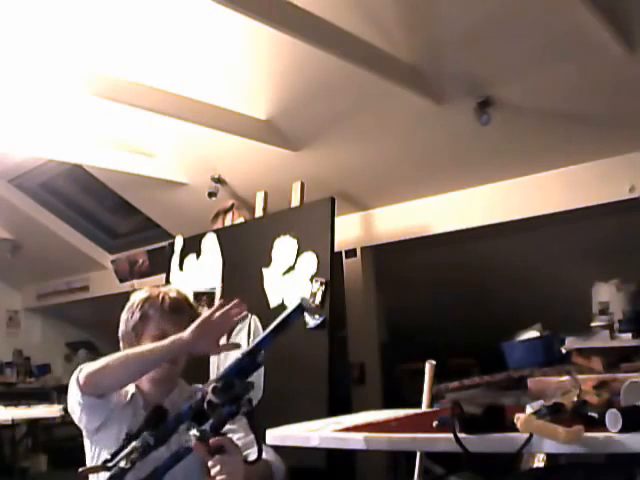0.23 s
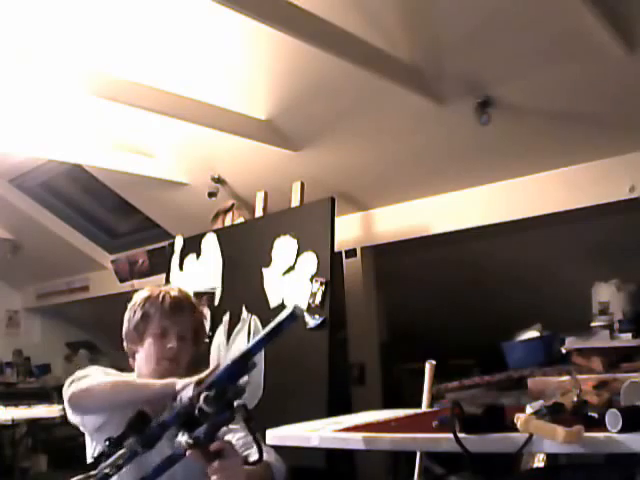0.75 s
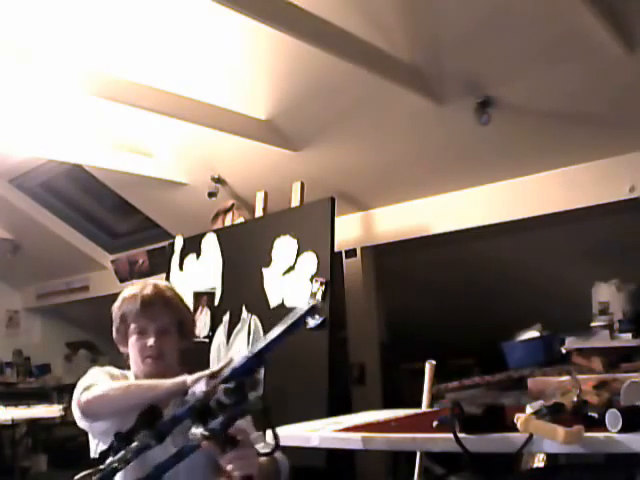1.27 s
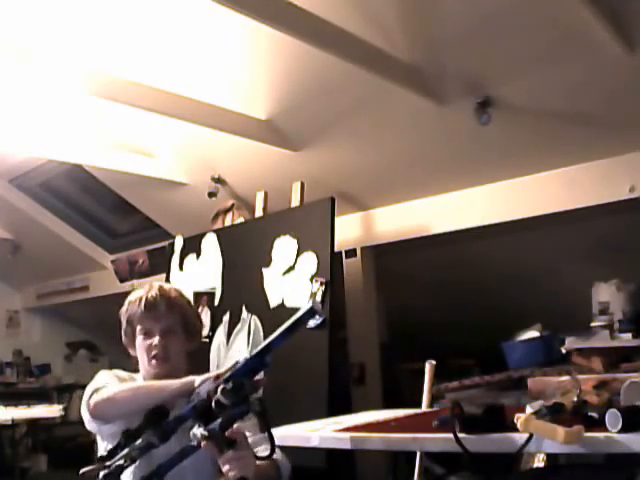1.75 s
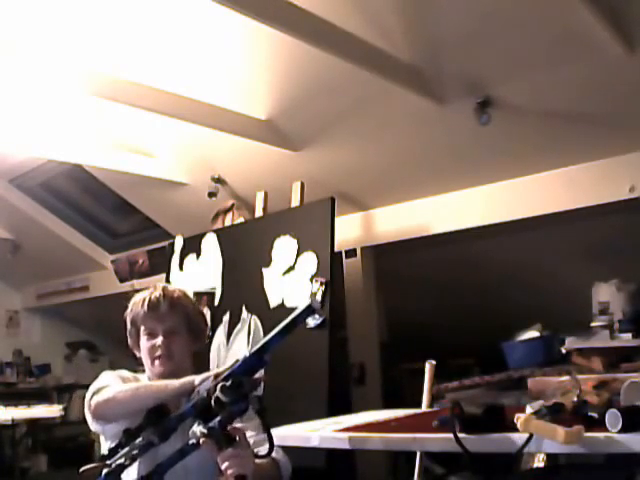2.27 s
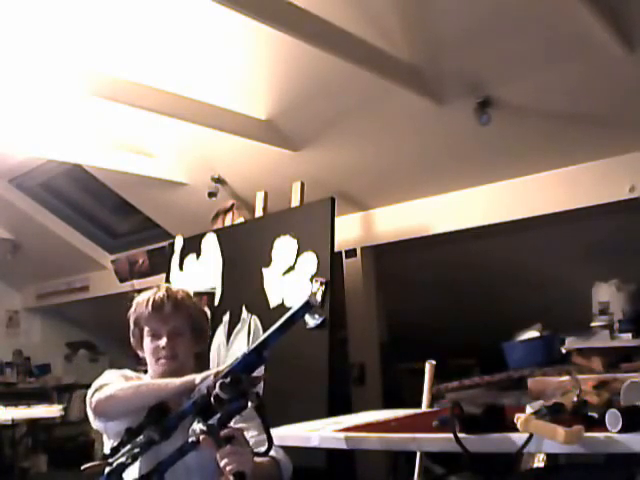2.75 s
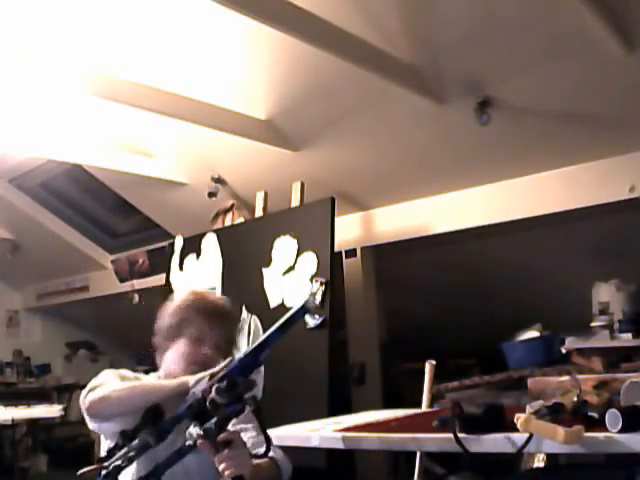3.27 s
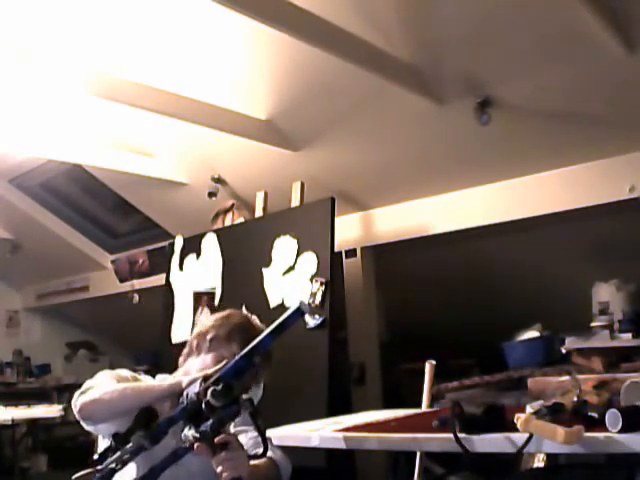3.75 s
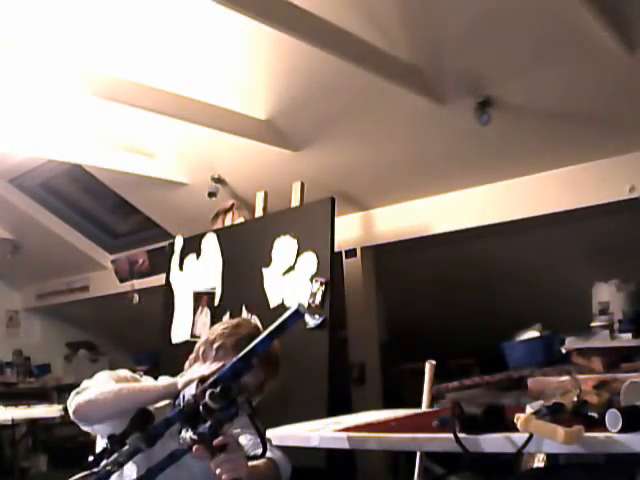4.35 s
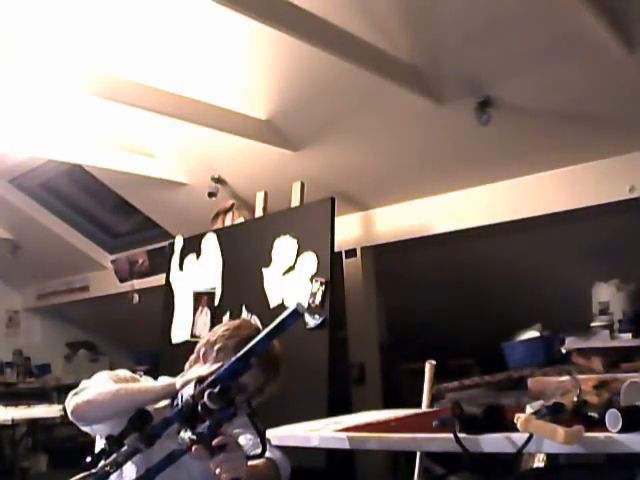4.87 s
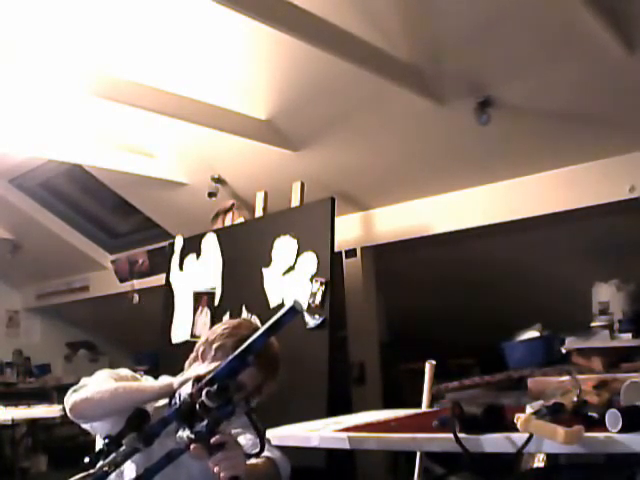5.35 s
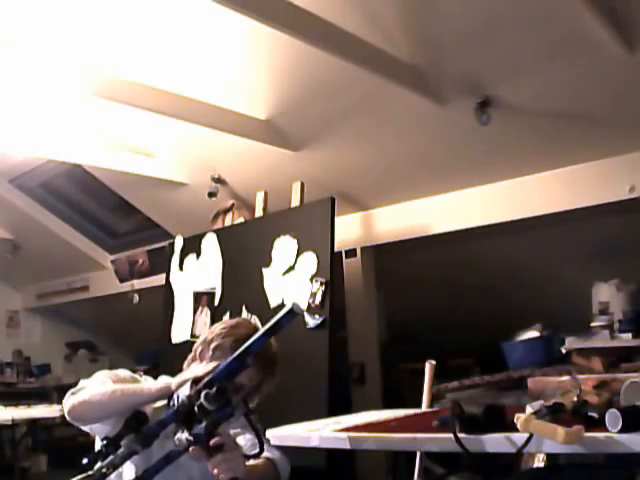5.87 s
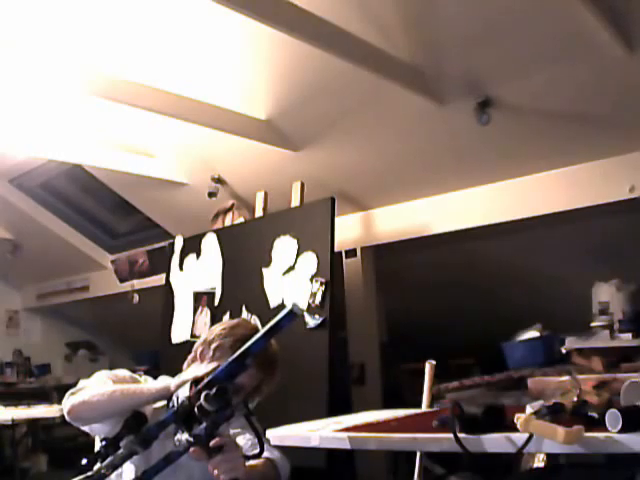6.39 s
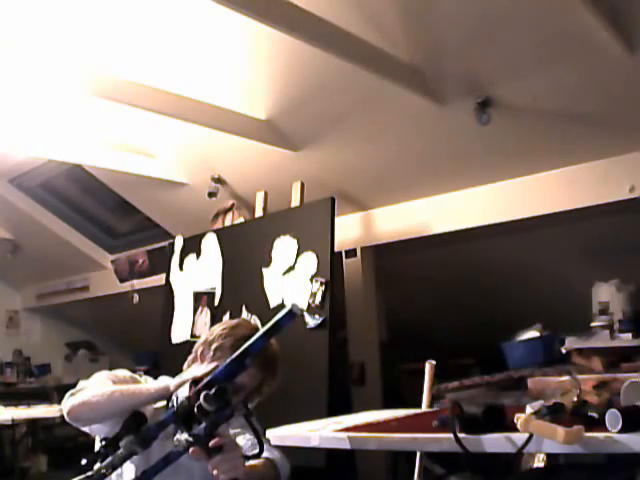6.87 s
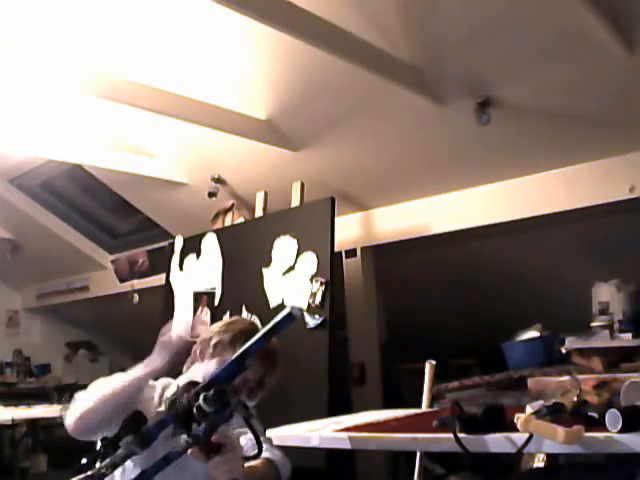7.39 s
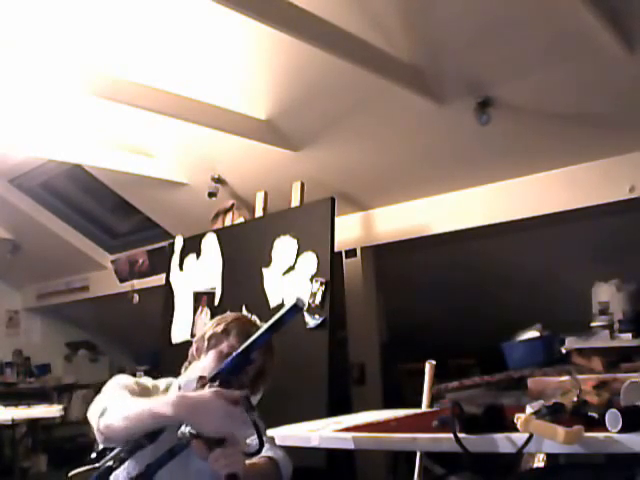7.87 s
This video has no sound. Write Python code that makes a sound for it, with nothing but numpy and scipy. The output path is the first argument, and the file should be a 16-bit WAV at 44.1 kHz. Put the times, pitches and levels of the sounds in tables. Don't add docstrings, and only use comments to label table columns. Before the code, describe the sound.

After a third of a second of low hiss, a small piston compressor starts with a knock, rattles steadily, then stalls and retries twice.

```python
import sys
import numpy as np
from scipy import signal
from scipy.fft import rfft, irfft
from scipy.io import wavfile

SR = 44100
rng = np.random.default_rng(int(sys.argv[2]) if len(sys.argv) > 2 else 0)


def to_linear_factor(level_db):
    exponent = np.asarray(level_db, float) / 20
    return 10 ** exponent


def waveform_to_disk(signal):
    frames = np.transpose(np.atleast_2d(signal))
    scaled = np.clip(frames, -1, 1) * 32767
    samples = np.round(scaled).astype(np.int16)
    wavfile.write(sys.argv[1], SR, samples)


N = 358533
TIME = np.arange(N) / SR


def evened(x):
    return x / np.sqrt(np.mean(x ** 2))


def curve(rows):
    return np.interp(TIME, *np.transpose(rows))


def coloured(x, points, rings=()):
    hz = np.fft.rfftfreq(len(x), 1 / SR) + .01
    point_hz, point_db = np.transpose(points)
    db = np.interp(np.log(hz), np.log(point_hz), point_db)
    for ring_hz, width_hz, top_db in rings:
        db = db + top_db / (1 + (2 * (hz - ring_hz) / width_hz) ** 2)
    return irfft(rfft(x) * to_linear_factor(db), len(x))


def waver(per_s):
    knots = rng.standard_normal(int(N / SR * per_s) + 2)
    return np.interp(TIME * per_s, np.arange(len(knots)), knots)


# [f/Hz, level/dB per Hz]
NOISE_TONE = [(3, 4.5), (12, -10), (30, -11.5), (60, -10.5), (120, -21.5), (300, -28), (1000, -36.5),
              (4000, -40.5), (15600, -39.5)]


def recorder_noise():
    return to_linear_factor(-28) * evened(coloured(rng.standard_normal(N), NOISE_TONE))


# [t/s, level/dB, f/Hz, time to die away by 60 dB/s]
JOLTS = [
    (0.34, -21, 1150, 0.11),
    (.35, -23, 4530, 0.13),
    (.385, -20, 804, 0.089),
    (7.265, -25, 910, 0.077),
    (7.421, -26, 1100, 0.082),
    (7.836, -19.5, 1150, 0.11),
    (7.995, -23, 1150, .07),
    (7.997, -32, 945, 0.076),
]


def jolts():
    out = np.zeros(N)
    t = np.arange(SR // 5) / SR
    for start, db, hz, t60 in JOLTS:
        roughness = np.cumsum(0.036 * rng.standard_normal(len(t)))
        rise = 1 - np.exp(-t / 0.0025)
        ring = to_linear_factor(db - 60 * t / t60) * rise * np.sin(2 * np.pi * hz * t + roughness)
        part = out[round(start * SR):][:len(t)]
        part += ring[:len(part)]
    return out


# [t/s, speed/turns per s]
RUNNING = [(.5, 35.7), (.85, 35.55), (1.35, 35.5), (2.35, 35.38), (2.85, 35.19), (3.35, 34.95),
           (4.35, 34.83), (5.35, 34.92), (6.1, 34.78), (7.17, 34.75), (7.7, 35), (8.13, 34.8)]
# [on t/s, off t/s]
POWER = [
    (.33, 7.175),
    (7.41, 7.77),
    (7.983, 9),
]


def crank_speed():
    crawl, spin_up_s, coast_s = 13, .05, .11
    drives = []
    for on, off in POWER:
        spin_up = 1 - np.exp(-(np.maximum(TIME - on, 0) / spin_up_s) ** 2)
        coast = np.exp(-(np.maximum(TIME - off, 0) / coast_s) ** 2)
        drives.append(spin_up * coast)
    return crawl + (curve(RUNNING) - crawl) * np.max(drives, axis=0)


# [t/s, crank turns missed]
LOST = [
    (2.433, .76),
    (6.45, .66),
    (7.43, .61),
]


def crank_turns(speed):
    missed_so_far = sum(missed * (np.arange(N) > at * SR) for at, missed in LOST)
    return np.cumsum(speed) / SR + .37 + missed_so_far


# [t/s, level/dB]
WHINE = [(.42, -27), (1.2, -26.5), (3.08, -24), (5.66, -26), (6.65, -30), (6.8, -25), (7.16, -31.5),
         (7.55, -33), (7.66, -28), (7.76, -28), (7.8, -40), (8.06, -31), (8.13, -38)]
ORDER = (1, 2, 3, 4, 5, 9, 11, 17, 19, 23, 24, 26, 31, 33, 34, 52, 57, 59, 62, 63, 69, 70, 71, 72, 73, 74,
         76, 83, 85)
# [tank empty level/dB, tank loaded level/dB]
ORDER_DB = [(-30, -30), (-32, -33), (-41, -43), (-42, -42), (-41, -42), (-39, -43), (-43, -40), (-33, -35),
            (-44, -37), (-40, -37), (-35.5, -36), (-39, -42), (-42, -45), (-41, -43), (-49, -47),
            (-42, -45), (-44, -49), (-46, -45), (-45, -47), (-48, -38), (-45, -38), (-39, -45), (-37, -46),
            (-36, -41), (-33.5, -34), (-39, -40), (-42, -50), (-43, -46), (-50, -41)]
# [from t/s, to t/s, lowest order, highest order, lift level/dB]
BUZZES = [
    (1.55, 2.95, 57, 62, 6),
    (5.4, 7.25, 33, 34, 6),
    (1.8, 4.8, 24, 24, 2),
    (4.8, 9, 71, 76, -4),
    (6, 7.8, 62, 70, 3),
]
GEAR_MESH = 18


def hum(turns, speed):
    full_speed, empty_speed, loaded_speed = 35.1, 35.5, 34.85
    angle = 2 * np.pi * turns + .003 * waver(15)
    tuned = np.exp(-((speed / full_speed - 1) / .11) ** 2)
    push = (speed / full_speed) ** 2.2
    out = to_linear_factor(curve(WHINE)) * tuned * np.cos(GEAR_MESH * angle)
    load = np.clip((empty_speed - curve(RUNNING)) / (empty_speed - loaded_speed), 0, 1)
    for order, (empty_db, loaded_db) in zip(ORDER, ORDER_DB):
        buzz_db = 0
        for a, b, low, high, lift_db in BUZZES:
            if low <= order <= high:
                buzz_db = buzz_db + lift_db * np.interp(TIME, [a - .1, a + .1, b - .1, b + .1], [0, 1, 1, 0])
        level = to_linear_factor(empty_db + (loaded_db - empty_db) * load + buzz_db + 1.3 * waver(4) + .8)
        start = np.pi * order
        if order > 2:
            start = np.pi * order ** 2 / (3 if order < 30 else 7)
        out += level * (tuned if order > 5 else push) * np.cos(order * angle + start)
    return np.sqrt(2) * out


# [t/s, level/dB]
RATTLE = [(.44, -15), (.93, -16), (.95, -14.5), (1.38, -15.5), (3.21, -15), (4.57, -16), (7.17, -15.5),
          (8.13, -15)]
# [bite t/s, shortfall at the bite level/dB, fade starts t/s]
BITES = [
    (.343, 6.5, 7.215),
    (7.419, 13, 7.79),
    (7.996, 8.5, 9),
]
# [t/s, level/dB, half length/s]
CHUGS = [
    (0.336, -32.5, 0.0071),
    (7.224, -15, .004),
    (7.27, -32, 0.01),
    (7.323, -31, 0.0067),
    (7.394, -37, .005),
    (7.862, -23, .005),
    (7.92, -36, .01),
]


def rattle_db():
    bite_s, swell_s, fade_db_per_s, knee_s = .003, 0.039, 190, 0.014
    power = 1e-6
    for bite, short_db, fade in BITES:
        since = np.maximum(TIME - bite, 0)
        swell_loss = short_db * np.exp(-since / swell_s)
        fade_loss = fade_db_per_s * knee_s * np.logaddexp(0, (TIME - fade) / knee_s)
        level = to_linear_factor(curve(RATTLE) - swell_loss - fade_loss) * (1 - np.exp(-since / bite_s))
        power = power + level ** 2
    for at, db, half in CHUGS:
        power = power + to_linear_factor(2 * db) * np.exp(-((TIME - at) / half) ** 2)
    return 10 * np.log10(power)


REPEAT = [(5, .4, 80), (30, .62, 70), (70, .58, 60), (110, .7, 45), (160, .62, 30), (205, .35, 14),
          (260, .08, 8), (320, .02, 8)]


def clatter_pattern(turns, count=1024, size=4096):
    order, share, memory = np.transpose(REPEAT)
    keep = np.exp(-1 / np.interp(np.arange(count), order, memory))
    share = np.interp(np.arange(count), order, share)
    share[[GEAR_MESH, *ORDER]] = 0
    a, b, c, d = rng.standard_normal((4, int(turns[-1]) + 2, count))
    worn, fresh = a + 1j * b, c + 1j * d
    for k in range(1, len(worn)):
        worn[k] = keep * worn[k - 1] + np.sqrt(1 - keep ** 2) * worn[k]
    worn *= 1.19 / np.sqrt(abs(worn))
    pattern = irfft(np.sqrt(share) * worn + np.sqrt(1 - share) * fresh, size).ravel()
    return np.interp(turns * size, np.arange(len(pattern)), pattern)


# [f/Hz, level/dB per Hz]
HOUSING = [(60, -8.5), (300, -9.5), (900, -9), (1600, -9.5), (2300, -4.5), (3200, -6), (4600, -3),
           (5900, -2.5), (6900, 2), (8200, -3.5), (9600, -1.5), (10600, -10.5), (12000, -18.5),
           (15600, -26.5)]
# [f/Hz, width/Hz, level/dB]
RINGS = [(594, 120, 3.2), (1150, 310, 3.6), (2330, 21, 0.76), (2504, 34, 2.9), (5005, 44, 4.9),
         (5330, 60, 2), (6270, 140, 3.4), (6440, 160, 1.1), (7500, 410, 1.6), (9500, 100, 0.81)]
# [f/Hz, change level/dB]
FULL_TINT = [(250, 0.5), (480, 3.5), (800, 1), (1400, -3), (2100, 0)]
# [t/s, level/dB]
SLAP = [(.3, -26), (2.6, -25), (3.1, -18), (4.6, -18), (5.1, -24), (8.13, -26)]


def rattle(turns):
    clatter = evened(coloured(clatter_pattern(turns), HOUSING, RINGS))
    fullness = np.minimum(TIME / 7, 1)
    clatter = clatter + fullness * (coloured(clatter, FULL_TINT) - clatter)
    body = signal.sosfiltfilt(signal.butter(2, 5200, fs=SR, output="sos"), clatter)
    hiss = clatter - body
    angle = 2 * np.pi * turns
    stroke_db = 2.9 * np.cos(2 * angle - 2.8) + 1.5 * np.cos(angle - 4.5) + np.cos(4 * angle - 4.1)
    knock_db = 0.55 * np.cos(4 * angle + 1.5) + 0.54 * np.cos(5 * angle) + .5 * waver(300)
    level_db = rattle_db() + .5
    linger_db = 0.4 * np.clip(-16 - level_db, 0, 14)
    body_db = level_db + linger_db + 0.13 * stroke_db + knock_db
    hiss_db = level_db + stroke_db + 0.73 * waver(300) + 0.23 * waver(30)
    burst = np.exp(30 * (np.cos(angle - 4.3) - 1)) * to_linear_factor(1.5 * waver(30))
    shut = burst * (clatter + .7 * np.cos(108 * angle) + np.cos(129 * angle))
    slap_band = signal.butter(2, [3600, 4750], "bandpass", fs=SR, output="sos")
    slap = evened(signal.sosfilt(slap_band, shut))
    return to_linear_factor(level_db + curve(SLAP)) * slap + to_linear_factor(body_db) * body + to_linear_factor(hiss_db) * hiss


def scene():
    speed = crank_speed()
    turns = crank_turns(speed)
    switched_on = TIME > .318
    compressor = switched_on * (rattle(turns) + hum(turns, speed)) + jolts()
    return (compressor + recorder_noise())[None]


# [first blank t/s, buffers, spacing/s, spacing shrinks/s per buffer, clock phase 0-1]
STRETCHES = [
    (.03279, 30, .0797312, 5.35e-6, .8),
    (2.49274, 50, .0795714, 0, .4),
    (6.46964, 12, .07951, 0, .2),
    (7.48812, 9, .0795112, 0, .05),
]


def blanks():
    out = []
    for first, count, spacing, shrink, phase in STRETCHES:
        k = np.arange(count)
        slips = .001 * np.floor(3 / 8 * k + phase)
        out += list(first + spacing * k - shrink * k ** 2 / 2 + slips)
    return np.array(out)


def low_pass(x):
    return signal.sosfilt(signal.butter(12, 15700, fs=SR, output="sos"), x)


def record(dry):
    late, on = np.zeros(N, int), np.ones(N)
    for at in np.round(blanks() * SR).astype(int):
        late[at:at + 2130] = 44
        on[at - 1:at + 15] = np.r_[.5, np.zeros(14), .4][:N - at + 1]
    clipped = np.clip(dry + .4162, -1, 1)
    mix = clipped[:, np.arange(N) - late] * on
    return low_pass(mix)


dry = scene()
out = record(dry)
waveform_to_disk(out)
```